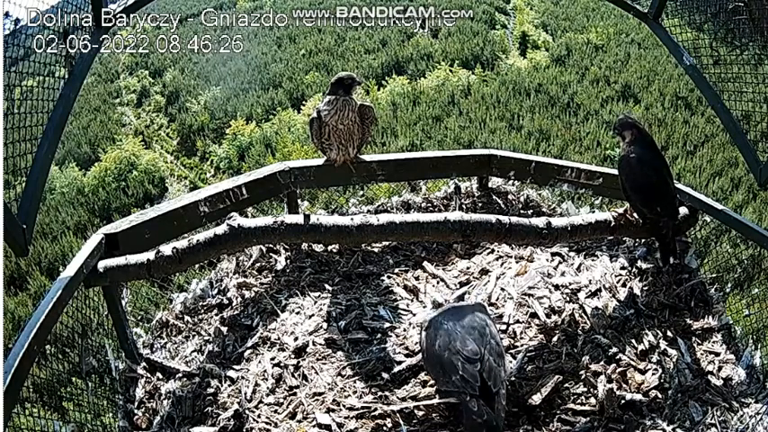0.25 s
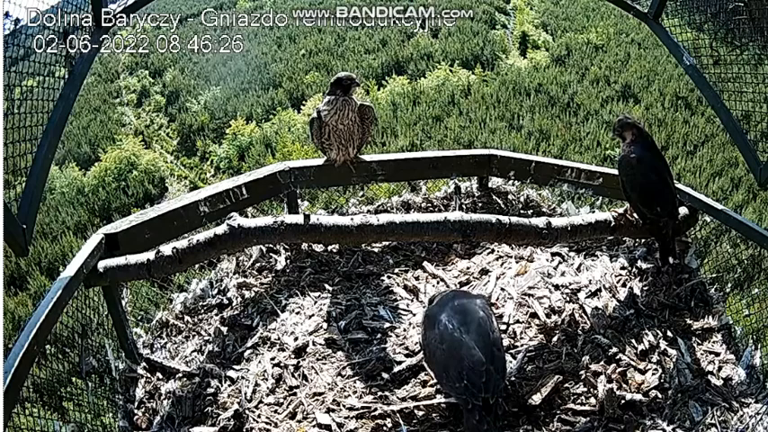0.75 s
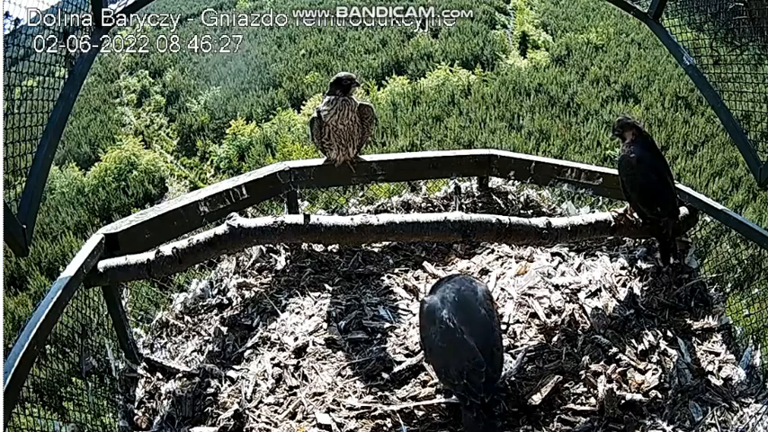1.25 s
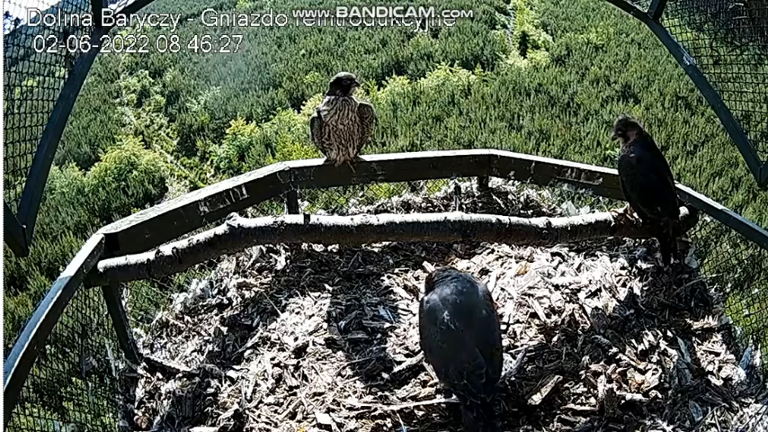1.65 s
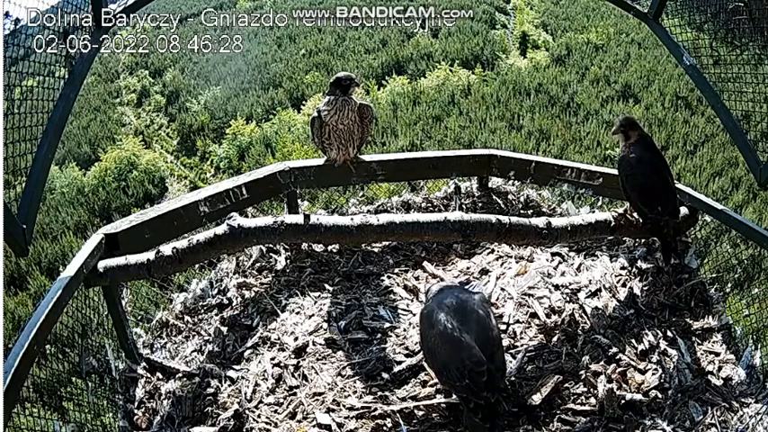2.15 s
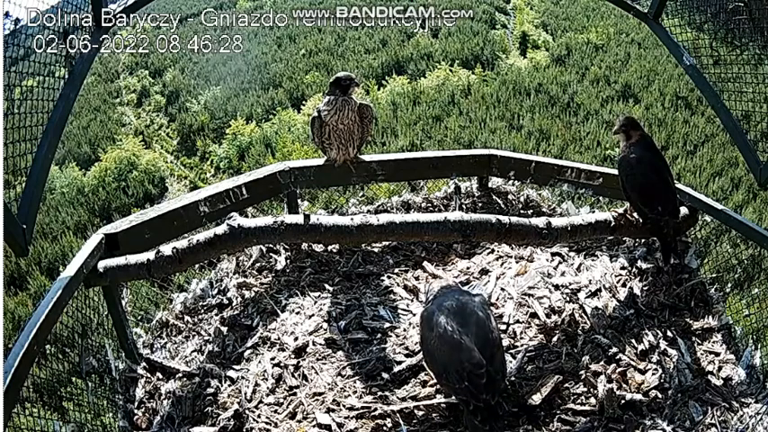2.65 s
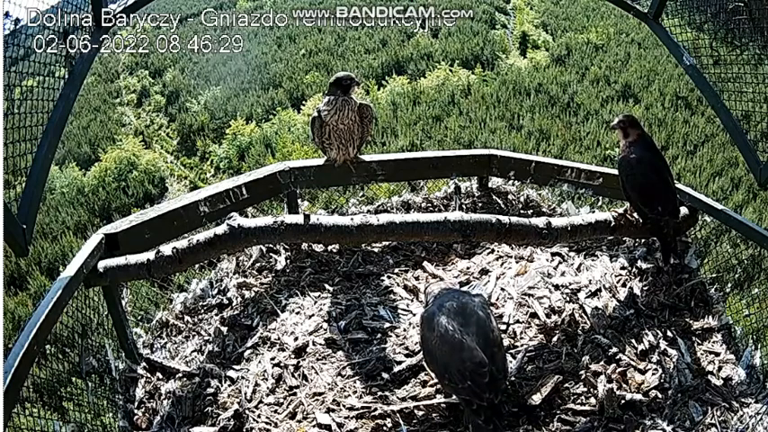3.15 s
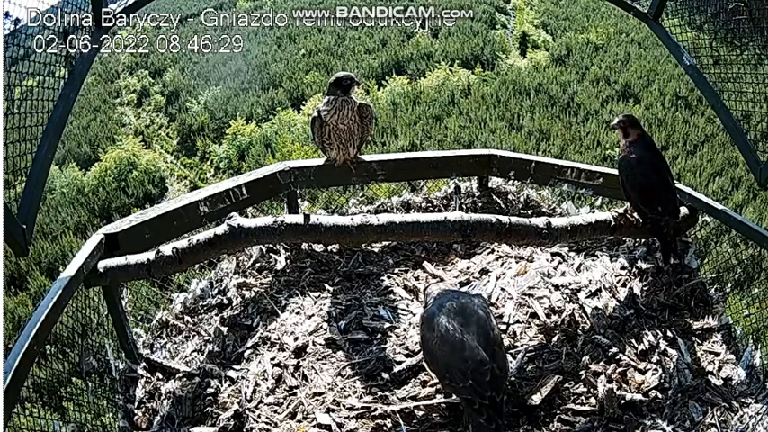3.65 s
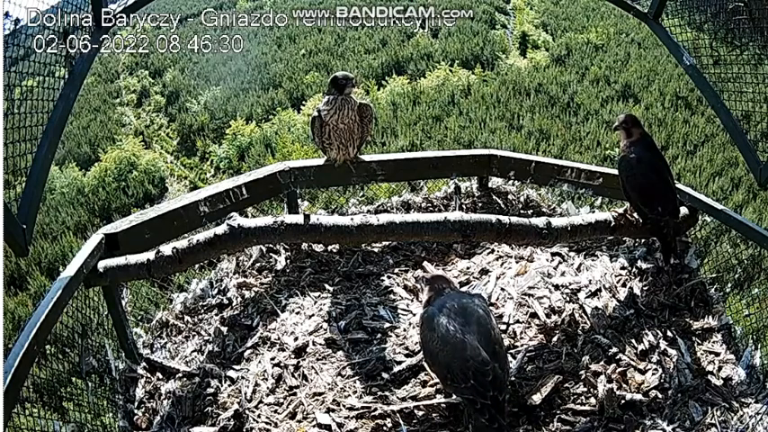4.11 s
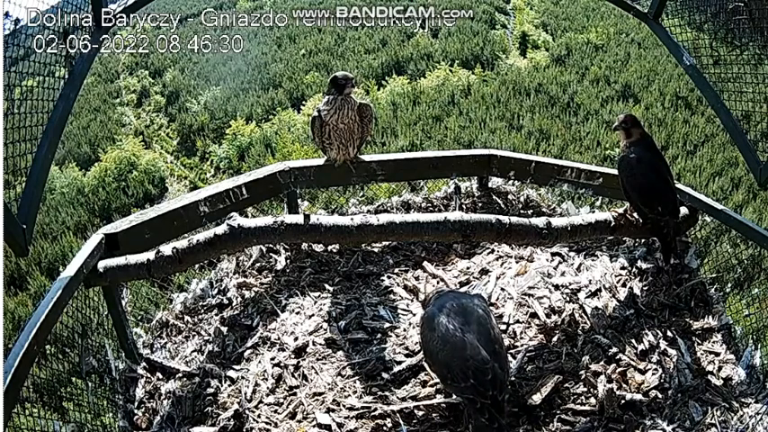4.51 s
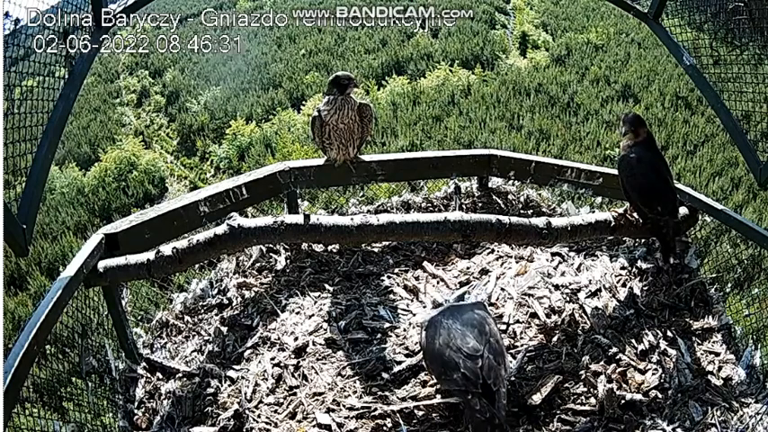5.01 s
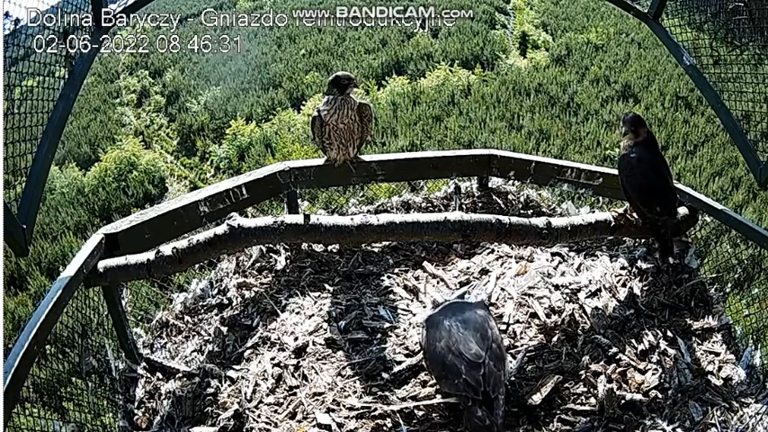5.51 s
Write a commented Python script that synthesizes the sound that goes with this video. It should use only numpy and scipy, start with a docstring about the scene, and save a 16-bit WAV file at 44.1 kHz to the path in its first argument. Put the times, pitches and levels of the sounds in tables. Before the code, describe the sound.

Close mono sound of begging falcons. Rough, cracking cries come about every 0.7 seconds, each with a cluck first, a hissy rasp, then loud piercing bursts that cut off with a downward drop. Higher whines overlap them, starting as short scooped yelps and splitting into two climbing notes. The box adds a slight ring and very short reflections; distant thin bird whistles and a low surging rumble lie behind.

```python
"""Young falcons beg at a nest box high above a forest, heard by one microphone.
One wails harshly: each cry opens with a cluck, swells as a rasp, catches in loud clear bursts and falls away.
Another yelps, then whines on two rising notes at once, one from each side of its syrinx.
The box rings and adds short reflections to both. A small bird sings far off over a low rumble and faint air."""
import sys
import numpy as np
from scipy import signal
from scipy.fft import rfft, irfft
from scipy.io import wavfile

SR = 44100
rng = np.random.default_rng(int(sys.argv[2]) if len(sys.argv) > 2 else 0)


def to_wav(s):
    """Save 16-bit WAV."""
    ch = np.atleast_2d(s).T  # columns
    pcm = np.round(np.clip(ch, -1, 1) * 32767)  # PCM
    wavfile.write(sys.argv[1], SR, pcm.astype(np.int16))


N = 254456
TIME = np.arange(N) / SR

# Harsh cries; voice levels are before throat and flutter. Each row: cluck in seconds (below 0: before the
# scene opens), swell start, swell end, fall start and end in seconds, top pitch in Hz, soft level in dB,
# full level in dB, brightness in dB per harmonic, hiss centre in Hz, hiss level in dB, cluck level in dB.
HARSH_CRIES = [ (-.4, -.3, -.1, .108, .165, 1635, -58, -41, 1.5, 3500, -60, -32),
               (.341, .485, .6, .765, .878, 1600, -59, -39.5, 1.5, 3600, -57, -31.5),
               (1.049, 1.19, 1.265, 1.555, 1.612, 1605, -54, -35, 1, 3800, -61, -32),
               (1.748, 1.853, 1.895, 2.226, 2.275, 1625, -51.5, -36, .5, 3250, -55, -31.5),
               (2.428, 2.51, 2.6, 2.938, 2.99, 1665, -53, -34.5, 0, 3350, -48, -32),
               (3.127, 3.243, 3.42, 3.645, 3.678, 1675, -43.5, -41.5, -.7, 3300, -48, -35),
               (3.85, 3.99, 4.1, 4.36, 4.41, 1655, -46.5, -36.5, -1.3, 3350, -47.5, -36.5),
               (4.59, 4.7, 4.84, 5.022, 5.068, 1675, -67, -40.5, -1.5, 3600, -57, -35),
               (5.227, 5.335, 5.45, 5.735, 5.8, 1640, -63, -33.5, -.2, 3450, -50, -31)]
# Bursts in which the cry locks on one clear note. Each row: start in seconds, end in seconds,
# level in dB before throat and flutter.
CLEAR_BURSTS = [(.111, .16, -28.5), (.597, .607, -31), (.75, .875, -27.5), (1.274, 1.303, -26),
                (1.361, 1.402, -26), (1.414, 1.61, -25.5), (1.98, 2.011, -26), (2.037, 2.065, -25.5),
                (2.075, 2.114, -25), (2.16, 2.193, -24.5), (2.215, 2.27, -25.5), (2.698, 2.762, -26.5),
                (2.831, 2.849, -27), (2.88, 2.99, -23.7), (3.397, 3.408, -35), (3.445, 3.463, -28),
                (3.502, 3.557, -25.5), (3.577, 3.621, -25), (3.644, 3.675, -27.5), (4.146, 4.197, -26.5),
                (4.215, 4.229, -27), (4.268, 4.287, -27), (4.322, 4.41, -25), (4.937, 4.961, -24.5),
                (4.967, 4.982, -25), (5.008, 5.065, -26), (5.594, 5.62, -26), (5.657, 5.77, -25.5)]
# Single notes that open the whines. Each row: start in seconds, end in seconds, top pitch in Hz,
# level in dB before the throat.
YELPS = [(1.4, 1.88, 2060, -52), (2.508, 2.572, 2170, -33.5), (3.448, 3.507, 2500, -26),
         (4.383, 4.426, 2600, -22), (5.247, 5.29, 2530, -23)]
# Two-note whines. Each row: start in seconds, end in seconds, upper note from Hz, to Hz, lower note from Hz,
# to Hz, level at the start, midway and at the end in dB before the throat, upper note's lead at the start
# in dB, at the end in dB, lower note's overtones in dB. A last drop in pitch comes on top.
WHINES = [ (1.88, 2.308, 2140, 2560, 1990, 2190, -58, -42, -32, 8, 4, -8),
          (2.572, 3.2, 2225, 2570, 1890, 2245, -50, -39, -36, 4, -2, 1.5),
          (3.56, 4.195, 2305, 2770, 2040, 2520, -46, -35, -38, 5, -15, 3),
          (4.426, 5.04, 2370, 2680, 2090, 2480, -39, -52, -34, 3, -9, -7),
          (5.29, 5.8, 2430, 2650, 2130, 2500, -36, -39, -33, 1, 0, -2)]
# Sliding notes of the distant songbird. Each row: start in seconds, length in seconds, start pitch in Hz,
# pitch it slides towards in Hz, level in dB.
SONG_NOTES = [(.215, .035, 5150, 5300, -58), (.95, .08, 5200, 4200, -72), (2.295, .1, 6300, 4600, -55),
              (2.46, .09, 6300, 4600, -54)]
# Throat of the harsh voice. Each row: frequency in Hz, gain in dB.
HARSH_THROAT = [(1450, -2.7), (2900, 1.3), (3400, -2), (4200, -2.8), (4650, -4.2), (5500, -26.5),
                (6150, -17.5), (7200, -37.5), (10000, -57), (14500, -59)]
# Throat of the whining voice. Each row: frequency in Hz, gain in dB.
WHINE_THROAT = [(2800, 0), (4000, -13.5), (4650, -10), (5300, -17), (6400, -38), (7100, -24), (7800, -24),
                (8800, -55.5), (11000, -42.5)]
# Colour of the broad rasp, the hiss and the open air. Each row: frequency in Hz, relative level in dB.
RASP_COLOUR = [(150, -27), (500, -11.5), (720, -6.5), (900, -10), (1200, 4.5), (1900, -11.5), (3000, -10),
               (4200, 0.5), (6200, -9), (7000, -18), (9000, -21.5), (10200, -39), (11600, -32),
               (14500, -60)]
HISS_COLOUR = [(1100, -37), (1600, -2), (2400, -21), (3500, 1.5), (4500, -10.5), (6200, -22), (7500, -53.5)]
AIR_COLOUR = [(700, 2), (3500, -5.5), (5300, -8), (9000, -23)]
# The low rumble's bands. Each row: centre in Hz, width of each of two passes in Hz, level in dB before surging.
RUMBLE_BANDS = [(61, 7.3, -67.5), (137, 27, -69), (46.6, 78, -67), (268, 130, -82.5)]
# The box's ringing mode, a single row: frequency in Hz, width in Hz, gain in dB.
BOX_MODE = (982, 13, 3.5)

# ceiling of a locked note's pitch, before jitter and fall
CLEAR_HZ = 1451
CUTOFF_HZ = 15700
# a cry's pitch arches: it starts low, tops out early and sags (shares of the top pitch; of the length)
ARCH_START, ARCH_END, ARCH_TOP_AT = .92, .925, .25
# the hiss swells and fades over this share of a cry
HISS_SHARE = .62
# the voice catches around the start of its swell
CATCH_DB, CATCH_S = 14, .017
# a soft voice is dull: dB lost per harmonic for each dB below the full level
DULLING = .24
# in the closing fall the pitch drops ever faster, the level more abruptly still (dB, share, two exponents)
FALL_DB, FALL_SHARE, FALL_CURVE, FADE_CURVE = 34, .16, 1.4, 1.6
# a soft voice cannot hold its pitch: below this level its jitter grows by this share per dB
STEADY_DB, UNSTEADY_PER_DB = -42, .16
# a yelp scoops up from this share below its top; time constant as a share of its length
SCOOP_SHARE, SCOOP_TIME = .14, .24
# whines climb a little faster at first, and drop by this share over the last DROP_S seconds
CLIMB_CURVE, DROP_SHARE, DROP_S = .92, .13, .022


def harsh_cries(rough=.015, clear_rough=.012, fall_rough=.025, buzz=.01, flutter_db=3.7, waver_db=2.2,
                clear_flutter_db=2.7, second_db=-7, rasp_db=14, burst_rasp_db=-18, rasp_growth=1.94,
                rasp_flutter_db=2.5, hiss_db=-16, lock_s=.009):
    """The two sides of the syrinx beat roughly against each other, then lock in loud bursts."""
    sounding, free_hz, level_db, tilt_db, fall = cry_shape()
    locks = [gate(start, end, lock_s) for start, end, _ in CLEAR_BURSTS]
    locked = np.clip(sum(locks), 0, 1)
    burst = sum(lock * from_db(db) for lock, (_, _, db) in zip(locks, CLEAR_BURSTS))
    free = (1 - locked) * from_db(level_db + waver_db * wobble(30))

    # locking pulls the pitch down and steadies it
    unsteady = 1 + UNSTEADY_PER_DB * np.maximum(STEADY_DB - level_db, 0)
    held_hz = np.minimum(free_hz, CLEAR_HZ)
    locked_hz = held_hz * (1 + clear_rough * wobble(70))
    rough_hz = free_hz * (1 + unsteady * rough * wobble(208))
    hz = locked * locked_hz + (1 - locked) * rough_hz
    sag = 1 - fall * (FALL_SHARE + fall_rough * wobble(300))

    flutter = wobble(130)
    clear_flutter = np.tanh(wobble(70))
    loudness = free * from_db(flutter_db * flutter - 2.0) + burst * from_db(clear_flutter_db * clear_flutter)
    first_side = loudness * voice(sag * hz * (1 + buzz * wobble(900)), tilt_db)
    # outside the bursts the second side sounds nearer the clear pitch
    second_hz = (held_hz + .25 * (free_hz - held_hz)) * (1 + rough * wobble(250))
    second_side = free * from_db(second_db) * voice(sag * second_hz, tilt_db)

    # soft cries carry a narrow hiss; broad turbulence takes over as they get loud
    narrow = free * from_db(hiss_db) * noise(HISS_COLOUR)
    turbulence = free * from_db(rasp_db + (rasp_growth - 1) * level_db) + burst * from_db(burst_rasp_db)
    broad = turbulence * from_db(rasp_flutter_db * flutter) * noise(RASP_COLOUR)
    fade = from_db(-FALL_DB * fall ** FADE_CURVE)
    return sounding * fade * (first_side + second_side + narrow + broad)


def cry_shape(edge_s=.013, delay_s=.015):
    """A cry catches, swells, holds and falls: gives sounding, pitch, level, tilt and how far it has fallen."""
    start, swell_from, swell_to, fall_from, end, top_hz, soft_db, full_db, bright_db, *_ = controls(HARSH_CRIES)
    arch = np.interp(progress(start, end), [0, ARCH_TOP_AT, 1], [ARCH_START, 1, ARCH_END])
    level_db = soft_db + (full_db - soft_db) * progress(swell_from, swell_to) - catches_db()
    tilt_db = bright_db - DULLING * (full_db - level_db)
    fall = progress(fall_from, end) ** FALL_CURVE
    return held(start + delay_s, end, edge_s), top_hz * arch, level_db, tilt_db, fall


def catches_db():
    """Loss of level as the voice catches around the start of each swell."""
    _, swell_from, *_ = controls(HARSH_CRIES)
    return CATCH_DB * np.exp(-np.abs(TIME - swell_from) / CATCH_S)


def voice(hz, tilt_db, count=9, order=4):
    """Harmonics of a vibrating membrane, shaped by the throat; the tilt turns the first four about the second."""
    phase = phase_of(hz)
    out = 0
    for k in range(1, count + 1):
        tilt = from_db((min(k, order) - 2) * tilt_db)  # the fourth's tilt holds for all above it
        out = out + at_hz(HARSH_THROAT, k * hz) * tilt * np.cos(k * phase)
    return out


def hiss(flutter_db=2.5, half_width_hz=230, broad_db=-10):
    """A narrow band of hiss, its centre set for each cry, swells and fades as each cry builds."""
    start, _, _, _, end, *_, centre_hz, hiss_db, _ = controls(HARSH_CRIES)
    along = progress(start, start + HISS_SHARE * (end - start))
    swell = 4 * along * (1 - along)
    phase = phase_of(centre_hz)
    band = wobble(half_width_hz) * np.cos(phase) + wobble(half_width_hz) * np.sin(phase)
    level = from_db(hiss_db - catches_db() + flutter_db * wobble(49))
    return swell * (band + from_db(broad_db) * noise(HISS_COLOUR)) * level


def clucks(pitch_hz=1190, rise_hz_per_s=5000, attack_s=0.0024, decay_s=0.0085,
           harmonic_db=(0, -3, -23, -25, -38)):
    """A short, low, rising note as the syrinx starts up."""
    loudness, hz = np.zeros(N), np.zeros(N)
    for s, *_, db in HARSH_CRIES:
        age = TIME - s
        near = np.abs(age) < .06  # seconds either side of the peak
        loudness += near * from_db(db) * np.exp(-np.maximum(-age / attack_s, age / decay_s))
        hz += near * (pitch_hz + rise_hz_per_s * age)
    phase = phase_of(hz * (1 + 0.034 * wobble(360)))
    return loudness * sum(from_db(db) * np.cos((k + 1) * phase) for k, db in enumerate(harmonic_db))


def yelps(jitter=.005, overtone_db=-13, edge_s=.009):
    """Both sides of the syrinx scoop up to one note together."""
    start, end, top_hz, level_db = controls(YELPS)
    hz = top_hz * (1 - SCOOP_SHARE * np.exp(-progress(start, end) / SCOOP_TIME))
    phase = phase_of(hz * (1 + jitter * wobble(300)))
    return held(start, end, edge_s) * whistle(phase, hz, level_db, overtone_db)


def whines(coupling=.13, waver=.005, jitter=.003, buzz=.0055, upper_overtone_db=-8.5, edge_s=.005):
    """The yelp splits into two climbing notes; each tugs at the other's phase, which adds faint side tones."""
    (start, end, upper_from, upper_to, lower_from, lower_to, start_db, middle_db, end_db,
     lead_from, lead_to, overtone_db) = controls(WHINES)
    along = progress(start, end)
    climb = along ** CLIMB_CURVE
    # waver and closing drop are common to both notes
    bend = (1 - DROP_SHARE * progress(end - DROP_S, end)) * (1 + waver * wobble(9))
    upper_hz = bend * (upper_from + (upper_to - upper_from) * climb)
    lower_hz = bend * (lower_from + (lower_to - lower_from) * climb)

    outer_db = np.where(along < .5, start_db, end_db)
    level_db = middle_db + (outer_db - middle_db) * np.abs(2 * along - 1)
    lead_db = lead_from + (lead_to - lead_from) * along

    upper_phase = phase_of(upper_hz * (1 + jitter * wobble(35) + buzz * wobble(470)))
    lower_phase = phase_of(lower_hz * (1 + jitter * wobble(35) + buzz * wobble(470)))
    # strongest when the two are equally loud
    tug = coupling * np.sin(upper_phase - lower_phase) / np.cosh(lead_db / 20)
    upper = whistle(upper_phase + tug, upper_hz, level_db + lead_db / 2, overtone_db + upper_overtone_db)
    lower = whistle(lower_phase + tug, lower_hz, level_db - lead_db / 2, overtone_db)
    return held(start, end, edge_s) * (upper + lower)


def whistle(phase, hz, level_db, overtone_db, count=4):
    """A note of four harmonics, flickering more the higher they lie, shaped by the throat."""
    out = 0
    for k in range(1, count + 1):
        harmonic_db = level_db + (k > 1) * overtone_db + 1.4 * k * wobble(9.3)
        out = out + at_hz(WHINE_THROAT, k * hz) * from_db(harmonic_db) * np.sin(k * phase)
    return out


def nest_box(x, t60=0.045, wet_db=-13):
    """The box rings at one pitch and adds a short wash of reflections."""
    wash = rng.standard_normal(N) * from_db(-60 * TIME / t60)
    wash = signal.lfilter([1], [1, -.5], wash[:SR // 2])  # duller reflections
    wash = wash / np.sqrt(np.sum(wash ** 2))
    hz, width_hz, db = BOX_MODE
    ring = from_db(db) * resonance(x, hz, width_hz)
    return x + ring + from_db(wet_db) * signal.fftconvolve(x, wash)[:N]


def songbird(glide_s=0.042):
    """Thin whistles, far off, that slide and flatten out."""
    out = 0
    for s, length_s, start_hz, end_hz, db in SONG_NOTES:
        hz = end_hz + (start_hz - end_hz) * np.exp(-np.maximum(TIME - s, 0) / glide_s)
        note = np.sin(phase_of(hz * (1 + 0.016 * wobble(400))))
        out = out + from_db(db) * gate(s, s + length_s, edge_s=0.03) * note
    return out


def background(air_db=-77, surge_db=3.0):
    """A low, surging rumble of resonant noise bands under faint open air."""
    rumble = 0
    for hz, width, db in RUMBLE_BANDS:
        band = resonance(resonance(rng.standard_normal(2 * N), hz, width), hz, width)
        rumble = rumble + from_db(db) * rms_one(band[N:])  # first half lets the resonance settle
    return rumble * from_db(surge_db * wobble(9.8)) + from_db(air_db) * noise(AIR_COLOUR)


def from_db(db):
    """Decibels to gain."""
    return 10 ** (np.asarray(db) / 20)


def rms_one(x):
    """Scale to unit rms."""
    return x / np.sqrt(np.mean(x ** 2) + 1e-20)


def at_hz(points, hz):
    """Gain of a spectrum at these frequencies, read along log frequency."""
    f, db = np.transpose(points)
    return from_db(np.interp(np.log(np.maximum(hz, 1)), np.log(f), db))


def noise(spectrum):
    """Coloured noise, rms 1."""
    gain = at_hz(spectrum, np.arange(N // 2 + 1) * SR / N)
    return rms_one(irfft(rfft(rng.standard_normal(N)) * gain, N))


def wobble(rate_hz):
    """Random motion up to about this rate, spread 1."""
    lowpass = signal.butter(2, min(rate_hz, SR / 4), fs=SR, output="sos")
    return rms_one(signal.sosfilt(lowpass, rng.standard_normal(2 * N))[N:])


def resonance(x, hz, width_hz):
    """Two-pole resonance with gain about 1 on top."""
    r = np.exp(-np.pi * width_hz / SR)
    zeros = np.array([1, 0, -1]) * (1 - r * r) / 2
    poles = [1, -2 * r * np.cos(2 * np.pi * hz / SR), r * r]
    return signal.lfilter(zeros, poles, x)


def phase_of(hz):
    """Running phase of a pitch curve."""
    return 2 * np.pi * np.cumsum(hz) / SR


def controls(calls):
    """Each column over time, taken from the call that began last."""
    rows = np.array(calls)
    return rows[np.maximum(np.searchsorted(rows[:, 0], TIME) - 1, 0)].T


def progress(start, end):
    """0 before start, rising evenly to 1 at the end."""
    return np.clip((TIME - start) / (end - start), 0, 1)


def gate(start, end, edge_s):
    """1 from start to end, with soft edges centred on both."""
    return np.sin(np.pi / 2 * np.clip(np.minimum(TIME - start, end - TIME) / edge_s + .5, 0, 1)) ** 2


def held(start, end, edge_s):
    """1 during a call, fading in and out inside its length."""
    return gate(start + edge_s / 2, end - edge_s / 2, edge_s)


def scene():
    """Both falcons at the box, the songbird and the rumble behind."""
    harsh_bird = harsh_cries() + hiss() + clucks()
    whining_bird = yelps() + whines()
    return (nest_box(harsh_bird + whining_bird) + songbird() + background())[None]


def record(dry):
    """One microphone channel, its top cut steeply."""
    return signal.sosfilt(signal.cheby2(12, 70, CUTOFF_HZ, fs=SR, output="sos"), dry)


dry = scene()
out = record(dry)
to_wav(out)
```